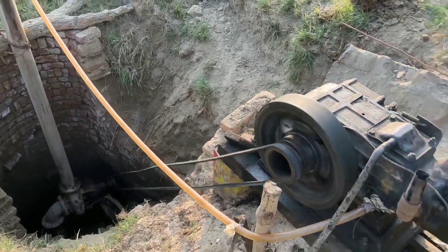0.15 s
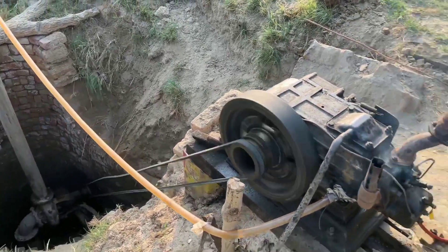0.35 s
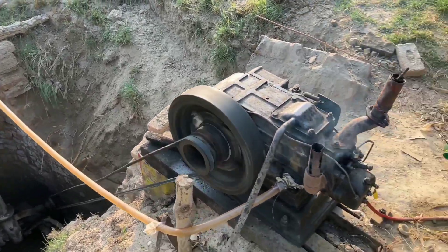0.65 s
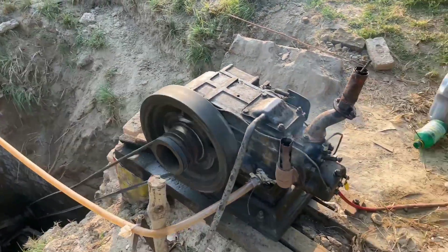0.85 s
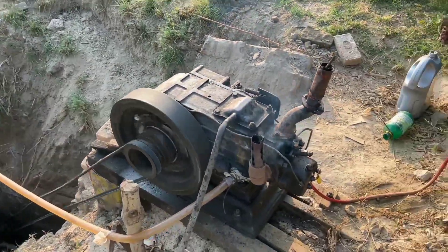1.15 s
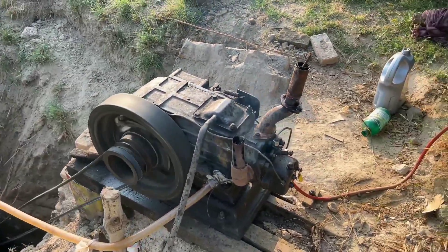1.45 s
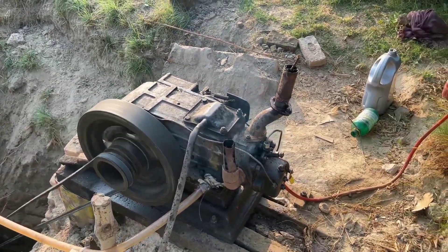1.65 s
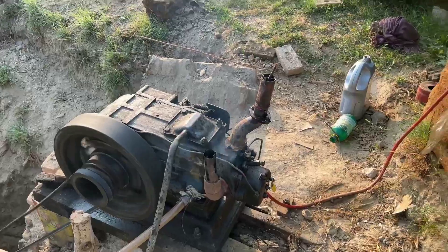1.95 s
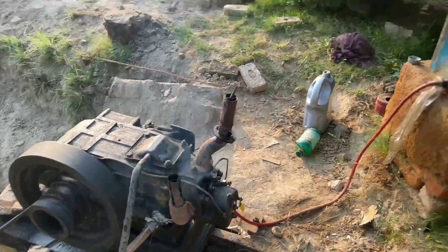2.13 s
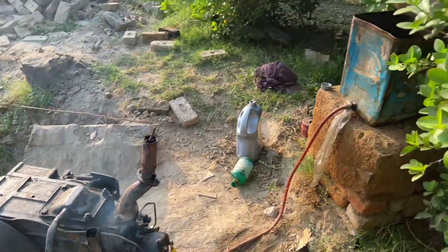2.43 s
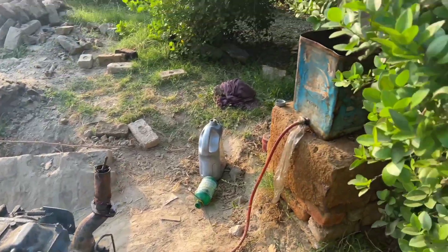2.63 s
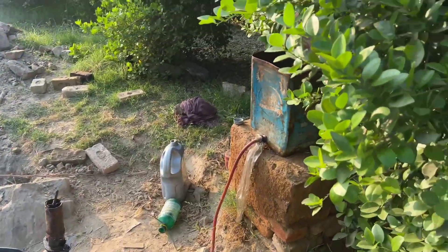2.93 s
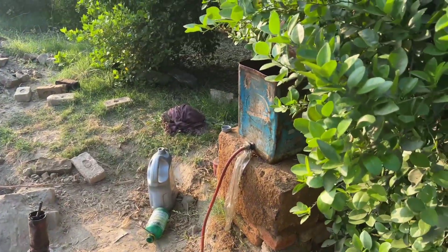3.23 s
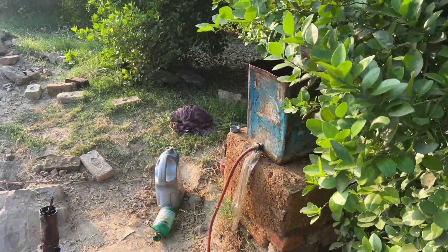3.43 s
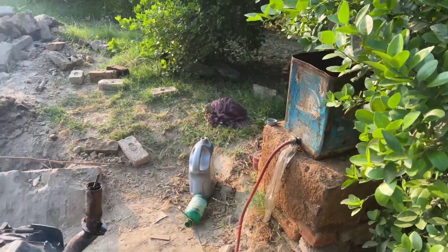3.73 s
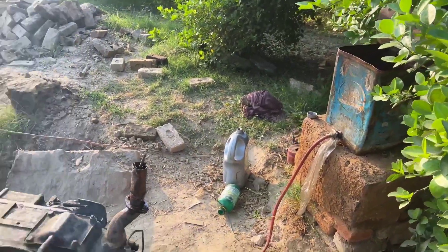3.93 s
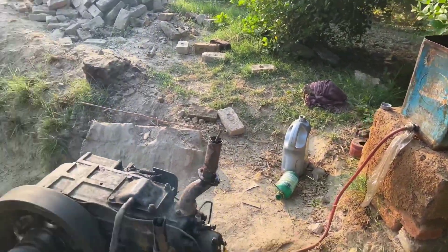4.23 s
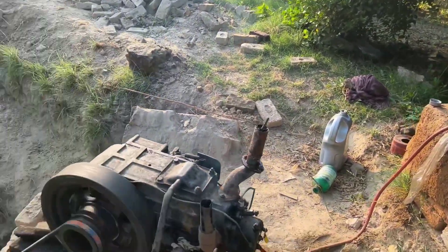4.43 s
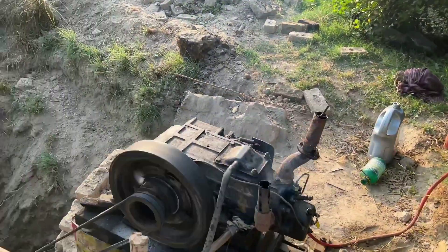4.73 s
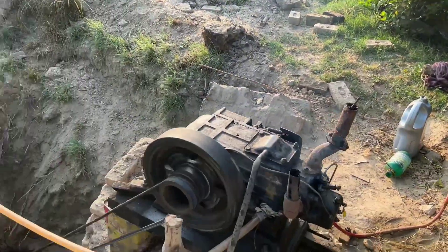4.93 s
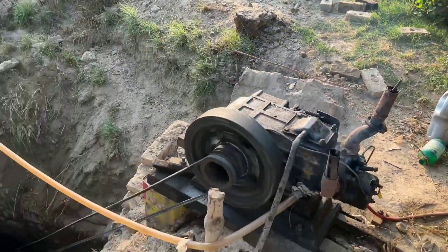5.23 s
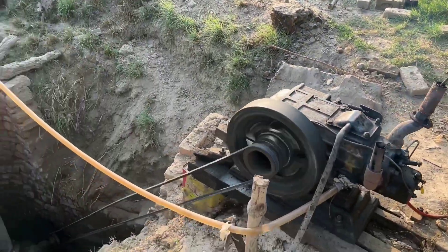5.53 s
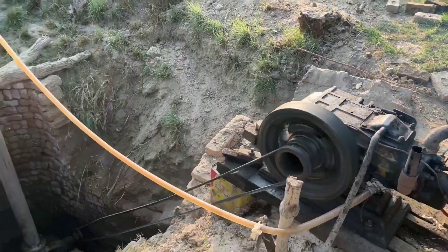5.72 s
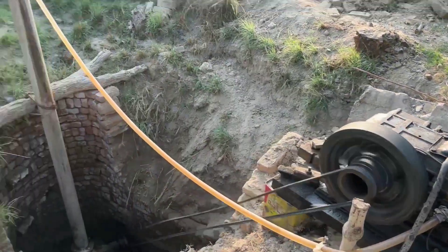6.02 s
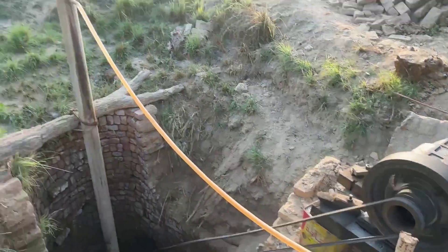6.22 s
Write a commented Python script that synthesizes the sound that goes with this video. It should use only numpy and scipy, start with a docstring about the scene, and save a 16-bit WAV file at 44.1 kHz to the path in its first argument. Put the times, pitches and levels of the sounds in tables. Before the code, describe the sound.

Steady, rapid exhaust thumps and metallic clatter come from a diesel engine driving a well pump, its belt chirping faintly.

```python
"""Outdoors at a well, a few metres from an old single-cylinder diesel that drives the pump by belt.
It chugs about ten times a second: combustion knocks in the block, a sharp jet of gas leaves the open
stack with a deep boom, a valve thuds and the intake gulps. Gears rattle, loose iron ticks, the belt chirps
twice a lap, and the earth bank scatters the blows over a soft rush of pump and water.
All is heard in stereo through a phone that pans across the scene and draws away."""
import sys
import numpy as np
from scipy import signal
from scipy.fft import rfft, irfft
from scipy.io import wavfile
from scipy.ndimage import uniform_filter1d, map_coordinates

SR = 44100
rng = np.random.default_rng(int(sys.argv[2]) if len(sys.argv) > 2 else 0)


def generate_wav(signal):
    """Clip the signal to [-1, 1] and save it as 16-bit WAV at the path in sys.argv[1]."""
    frames = np.transpose(np.atleast_2d(signal))
    scaled = np.clip(frames, -1, 1) * 32767
    pcm = np.round(scaled).astype(np.int16)
    wavfile.write(sys.argv[1], SR, pcm)


N = 280917
TIME = np.arange(N) / SR
CYCLE = np.arange(int(-.03 * SR), int(.16 * SR)) / SR  # seconds from one cycle's exhaust blow
FACING_DB_PER_DEG = 0.1027  # gain of a ringing mode as the phone swings right, times its beaming factor

# the phone's swing from well to water tank and back: t/s, pan to the right/deg, distance/m
PHONE_PATH = [(0, -24.5, 2.21), (.8, -7.5, 1.85), (1.251, 5.5, 2.01), (2.002, 4.5, 1.96), (2.7, 30, 2.1),
              (3.3, 35.5, 2.33), (4.0, 22, 2.2), (4.899, 3, 2.14), (5.35, -8, 2.63), (5.65, -10, 2.7),
              (6.3, -40, 3.05)]


def undb(db):
    """Decibels to amplitude."""
    return 10 ** (np.asarray(db) / 20)


def on_log_hz(points, size):
    """A curve of (f/Hz, value) read at the bins of a spectrum."""
    hz, value = np.transpose(points)
    return np.interp(np.log(np.fft.rfftfreq(size, 1 / SR) + 1), np.log(hz), value)


def noise(spectrum, count, size=len(CYCLE)):
    """Rows of coloured noise, rms 1: the spectrum sets only the colour."""
    white = rng.standard_normal((count, size))
    coloured = irfft(rfft(white) * undb(on_log_hz(spectrum, size)), size)
    return coloured / coloured.std()


def swell(start, rise, steep):
    """An envelope within the cycle that peaks at 1, rise seconds after its start, and dies away."""
    u = np.maximum(CYCLE - start, 0) / rise
    return (u * np.exp(1 - u)) ** steep


def blows(first_s=.0318):
    """Times of the exhaust blows, as a column: a four-stroke fires once in two turns of the flywheel."""
    # the governed flywheel sags a little under load: t/s, speed/rpm
    flywheel_speed = [(0, 1234.1), (1.45, 1232.6), (2.35, 1226.7), (5.15, 1226.3), (5.65, 1223.9)]
    t = TIME[::100]
    cycles = np.cumsum(np.interp(t, *np.transpose(flywheel_speed))) * t[1] / (2 * 60)
    cycles = cycles - np.interp(first_s, t, cycles)
    return np.interp(np.arange(int(cycles[-1]) + 1), cycles, t)[:, None]


def uneven(spread_db):
    """A random gain for each cycle."""
    return undb(spread_db * rng.standard_normal(blows().shape))


def every_cycle(rows):
    """Lays one row of sound at each exhaust blow."""
    pad = len(CYCLE)
    track = np.zeros(N + 2 * pad)
    for s, row in zip(blows()[:, 0], rows):
        i = pad + int((s + CYCLE[0]) * SR)
        track[i:i + pad] += row
    return track[pad:pad + N]


def pan(t):
    """Degrees by which the phone points to the right of the engine."""
    s, degrees, _ = np.transpose(PHONE_PATH)
    return np.interp(t, s, degrees)


def carry(t, db_per_deg, near_m=2.0):
    """How much of a source reaches the phone: less with distance, more or less as it swings."""
    s, _, metres = np.transpose(PHONE_PATH)
    return undb(db_per_deg * pan(t)) * near_m / np.interp(t, s, metres)


def both_ports(source, likeness):
    """Sound that arrives by many paths: the two microphone ports share only part of it."""
    shared = source()
    return np.array([shared, likeness * shared + np.sqrt(1 - likeness ** 2) * source()])


def shade_right_port(x):
    """The phone shades its far port in the middle range, less so as it turns to either side."""
    # right port against left: f/Hz, level/dB
    shade = [(90, 0.5), (190, -.5), (300, -4), (420, -9), (580, -11.5), (760, -5.5), (1100, -8),
             (1700, -14), (2500, -11.5), (3700, -17.5), (5300, -18.5), (7000, -17.5), (8600, -7.5),
             (9700, -0.5)]
    # right port behind left: f/Hz, phase lag/rad
    phase_lag = [(30, 0), (400, .7), (750, .7), (1300, 2.4), (3000, 2.2), (4000, .8), (5700, 2.9),
                 (7800, 0), (10200, -3.1), (12000, -6.3), (13900, -9.4), (15500, -12.6)]
    shaded = irfft(rfft(x) * undb(on_log_hz(shade, N)) * np.exp(-1j * on_log_hz(phase_lag, N)), N)
    middle = signal.sosfiltfilt(signal.butter(1, [1000, 7000], "band", fs=SR, output="sos"), shaded)
    lift_db = 2 + 0.0911 * np.abs(pan(TIME))
    return shaded + middle * (undb(lift_db) - 1)


def rush():
    """Pump, belt and running water leave a soft, steady bed between the blows."""
    # dark wash: f/Hz, level/dB
    spectrum = [(20, -3), (45, -6), (120, 1.5), (300, 2), (800, -3), (2000, -11.5), (4000, -21),
                (7000, -20), (10000, -36), (15000, -37), (16500, -50)]
    return undb(-38) * noise(spectrum, count=1, size=N)[0]


def scatter():
    """The bright edge of the knock, then the blow coming back from the ground, the well and the bank."""
    # colour of the scattered sound: f/Hz, level/dB
    spectrum = [(150, 7.5), (500, 2.5), (1100, 0), (1600, 4), (2400, 0.5), (3600, 0.5), (5000, 0),
                (6800, -3), (8200, -10), (9800, -18), (12000, -15.5), (15200, -19), (16200, -34)]
    edge = undb(-29.5) * swell(-.024, .013, 2.55)
    early = undb(-31) * swell(.0045, .02, 1.9) + undb(-33) * swell(.0095, .01, 2.8)
    late = undb(-38.5) * swell(.032, .012, 2.7) + undb(-50.5) * swell(.054, .012, 2.5)
    return every_cycle(noise(spectrum, count=len(blows())) * (edge + early + late) * uneven(1.0))


def belt(lap_s=.9745, rough=0.3, length_s=.0082, fall_hz_per_s=9000, octave_db=-7):
    """Each slick spot slips on the pulley once a lap, with a short, rough, falling chirp."""
    # slick spots on the belt: first pass t/s, f/Hz, level/dB
    slick_spots = [(0.548, 3790, -27), (.777, 3460, -28.5)]
    chirps = 0
    for first, hz, db in slick_spots:
        age = (TIME - first + lap_s / 2) % lap_s - lap_s / 2  # time from the nearest pass
        waver = uniform_filter1d(rng.standard_normal(N), size=60)
        phase = 2 * np.pi * np.cumsum(hz * (1 + rough * waver) - fall_hz_per_s * age) / SR
        tone = np.sin(phase) + undb(octave_db) * np.sin(2 * phase)
        chirps = chirps + undb(db) * np.exp(-(age / length_s) ** 2) * tone
    return chirps


def ticks(count=11, decay_s=.0043):
    """Loose iron parts tick after each blow, each with a brief ring; later ticks tend to be softer."""
    rows = 0
    for _ in range(count):
        lateness, pitch, softness = rng.random((len(blows()), 3)).T[:, :, None]
        start = .012 + .055 * lateness
        hz = 1400 * 4.6 ** pitch
        db = -20.5 - 12.3 * softness - 21 * lateness
        age = np.maximum(CYCLE - start, 0)
        rows = rows + undb(db) * np.sin(2 * np.pi * hz * age) * np.exp(-age / decay_s)
    return every_cycle(rows)


def rattle(db_per_deg=0.0963):
    """Gears and rockers strike the same way in every cycle, so much of their clatter repeats."""
    # colour of the clatter: f/Hz, level/dB
    spectrum = [(100, -5), (200, -6), (330, -8.5), (450, -2), (620, -3), (800, -6), (1080, 1), (1300, -8),
                (1620, -1), (2200, -22.5), (3700, -14.5), (6500, -49), (10000, -55)]
    envelope = (undb(-30.5) * swell(-.025, .0054, 1.2)
                + undb(-25) * swell(-.0014, .0039, 0.61)
                + undb(-34.5) * swell(.016, .024, 3.34))
    repeating = noise(spectrum, count=1)
    fresh = undb(-7.5) * noise(spectrum, count=len(blows()))
    return every_cycle((repeating + fresh) * envelope * undb(db_per_deg * pan(blows())) * uneven(1.2))


def body_rings(detune_spread=0.0047):
    """Stack, iron, valve gear and intake ring in turn; some modes carry better to the flywheel side."""
    # stack rings, thin iron, valve thuds, then the intake gulp:
    # start from the blow t/s, f/Hz, rise/s, steepness, level/dB, beaming factor
    modes = [ (-.0035, 154.2, 0.0069, 1.5, -26, -0.3), (-.0004, 350, 0.0025, 3.6, -17, 0.5),
             (-.0020, 510, 0.0038, 0.67, -25.5, 1), (-.0016, 745, 0.0034, 3.3, -29.5, -0.5),
             (-.0010, 554.4, 0.012, 0.52, -34, 0.1), (-.0010, 246, 0.012, 0.58, -39.5, -2.3),
             (.0040, 3830, 0.016, 0.86, -41.5, 1.5), (-0.0098, 6850, 0.013, 1, -44.5, -3.5),
             (.0270, 420.4, 0.0052, 2.6, -19.5, 0.5), (.0410, 710, 0.0064, 3, -33.5, 0.5),
             (.0360, 1082, 0.0069, 2.4, -31, 2.5), (.0574, 200, 0.0072, 0.48, -30, 0),
             (.0550, 985, 0.017, 1.9, -42.5, 3.8), ]
    rows, facing_db = 0, FACING_DB_PER_DEG * pan(blows())
    for start, hz, rise, steep, db, beaming in modes:
        detune = 1 + detune_spread * rng.standard_normal(facing_db.shape)
        ring = np.sin(2 * np.pi * hz * detune * (CYCLE - start)) * swell(start, rise, steep)
        rows = rows + undb(db + beaming * facing_db) * ring * uneven(0.29)
    return every_cycle(rows)


def knock():
    """Combustion pressure builds and rings the block, alike in every cycle, with a slight pitch fall."""
    # modes of the block: f/Hz, level/dB, beaming factor, rise/s
    modes = [(595.2, -18.5, 0, 0.0065), (759, -16.5, 1.5, 0.0049), (868, -36, -0.7, 0.011)]
    age = CYCLE + .0142  # the modes are in phase just ahead of the exhaust blow
    rows, facing_db = 0, FACING_DB_PER_DEG * pan(blows())
    for hz, db, beaming, rise in modes:
        ring = np.cos(2 * np.pi * hz * (age - 1.2 * age ** 2)) * swell(-.0212, rise, 2.2)
        rows = rows - undb(db + beaming * facing_db) * ring * uneven(0.21)
    return every_cycle(rows)


def sizzle():
    """A high sizzle with each exhaust blow, and a faint hiss during the knock before it."""
    # colour of the sizzle: f/Hz, level/dB
    spectrum = [(6000, -9.5), (8500, 2.5), (10200, -1.5), (11500, 1), (13000, -3.5), (14200, 1),
                (15100, -2), (15700, -13), (16500, -42)]
    # slow drift of the sizzle: t/s, level/dB
    drift = [(0.35, -23.5), (.95, -18.5), (1.399, -21), (2.15, -18), (2.498, -23.5), (3.9, -22.5),
             (4.251, -22), (5.0, -23), (6.099, -25.5)]
    envelope = swell(-.0023, .0048, 1.98) + undb(-20.5) * swell(-.023, .01, 4.6)
    db = np.interp(blows(), *np.transpose(drift))
    return every_cycle(noise(spectrum, count=len(db)) * undb(db) * uneven(1.0) * envelope)


def boom():
    """A deep boom with each exhaust blow; the bass falls in pitch."""
    age = np.maximum(CYCLE - .001, 0)
    hz = 19 + 86 * np.exp(-age / .047)
    tone = np.cos(2 * np.pi * np.cumsum(hz * (age > 0)) / SR)
    return every_cycle(undb(-14) * tone * swell(.0012, .018, 4.8) * uneven(0.12))


def jet(patchy_db=1.96, patch_hz=200, bounce_db=2.0):
    """The exhaust valve opens: a turbulent burst that favours other resonances of the stack each time."""
    # colour of the exhaust gas: f/Hz, level/dB
    spectrum = [(150, -27), (400, -1), (700, 3), (1100, -7.5), (1700, 2.5), (2200, -1.5), (3000, 0),
                (4300, 2.5), (5300, -3.5), (6600, -3.5), (7600, -13), (9000, -34), (11000, -37)]
    # bounce off the uneven ground as the phone moves: t/s, delay/s
    bounce = [(0, .00057), (.9, .00050), (2.0, .00072), (2.55, .00039), (3.8, .00038), (4.5, .00053),
              (5.5, .00052), (6.3, .00063)]
    hz, degrees = np.fft.rfftfreq(len(CYCLE), 1 / SR), pan(blows())
    knots = np.arange(0, SR / 2, patch_hz)
    draws = rng.standard_normal((len(degrees), len(hz)))
    patches = np.array([np.interp(hz, knots, row[:len(knots)]) for row in draws])
    tilt_db = 0.028 * degrees * np.log2((hz + 300) / 2600)  # brighter as the phone swings right
    delay_s = np.interp(blows(), *np.transpose(bounce))
    comb = np.cos(2 * np.pi * hz * delay_s) * np.exp(-(hz / 3800) ** 2)  # fades out in the treble
    colour_db = patchy_db * patches + tilt_db + bounce_db * comb
    gas = irfft(rfft(noise(spectrum, count=len(degrees))) * undb(colour_db), len(CYCLE))
    gain = undb(-10.5) * carry(blows(), db_per_deg=0.03) * uneven(0.6)
    return every_cycle(gas * gain * swell(-.0022, .005, 2.56))


def scene(port_spacing_m=.14, sound_m_per_s=343):
    """Engine, belt and surroundings at the two ports of the swinging phone."""
    engine = knock() + body_rings() + rattle() + ticks()
    engine = undb(1.4) * carry(TIME, db_per_deg=-0.0523) * engine
    direct = carry(TIME, db_per_deg=-0.0024) * boom() + engine + belt() + rush()
    left, right = direct + both_ports(jet, likeness=0.5)
    # the path to the right port changes as the phone swings
    lag_samples = port_spacing_m * np.sin(np.radians(pan(TIME))) / sound_m_per_s * SR
    right = map_coordinates(right, [np.arange(N) - lag_samples], order=3, mode="nearest")
    scattered = undb(0.27) * carry(TIME, db_per_deg=0.04) * both_ports(scatter, likeness=0.73)
    around = scattered + sizzle()
    return np.array([left + around[0], shade_right_port(right + around[1])])


def record(dry, low_hz=33, top_hz=16200):
    """The phone drops the deepest bass, rounds the sharpest peaks and cuts the top."""
    trimmed = signal.sosfiltfilt(signal.butter(4, low_hz, "high", fs=SR, output="sos"), dry)
    rounded = trimmed / (1 + np.abs(trimmed) ** 6) ** (1 / 6)
    return signal.sosfilt(signal.ellip(8, .2, 80, top_hz, fs=SR, output="sos"), rounded)


dry = scene()
out = record(dry)
generate_wav(out)
```